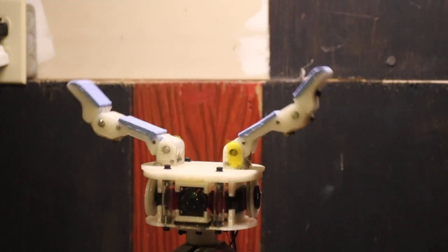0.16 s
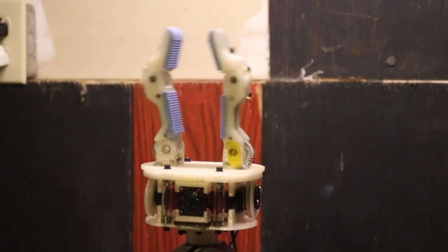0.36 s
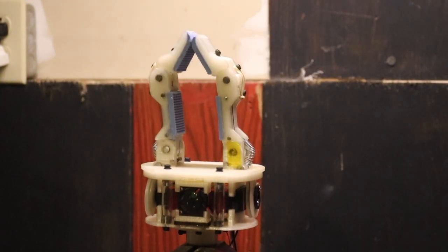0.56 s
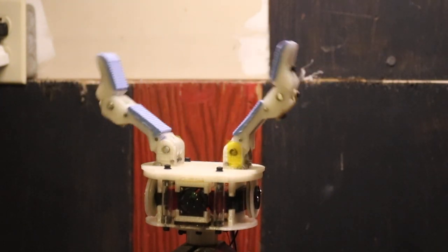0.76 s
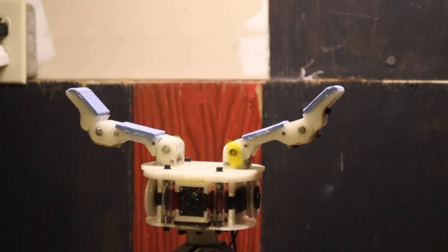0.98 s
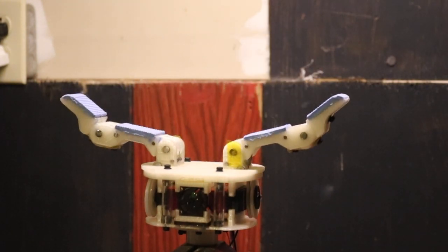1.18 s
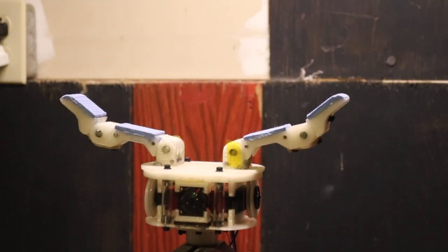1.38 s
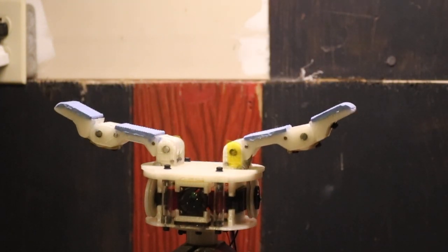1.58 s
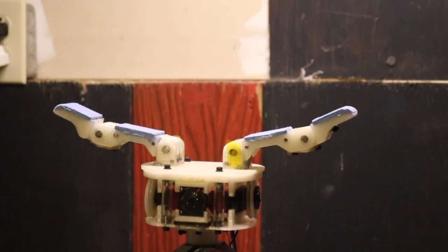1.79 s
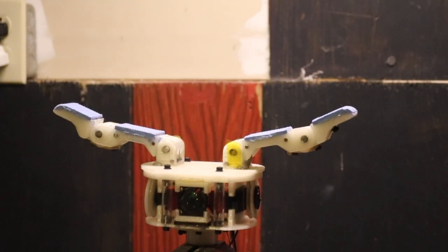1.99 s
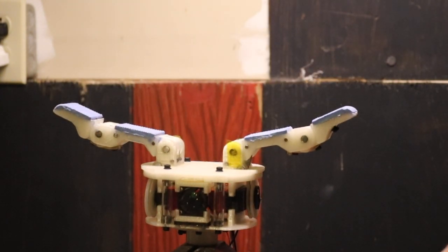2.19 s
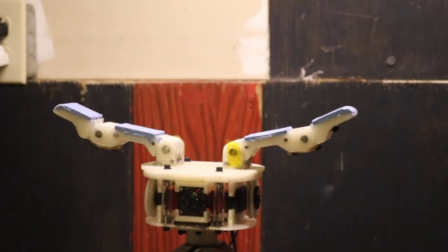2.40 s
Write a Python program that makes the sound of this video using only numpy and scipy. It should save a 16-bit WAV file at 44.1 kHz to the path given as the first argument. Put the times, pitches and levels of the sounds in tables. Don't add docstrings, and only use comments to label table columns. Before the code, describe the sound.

Small geared motors whirr and rattle as a robotic gripper snaps shut, then eases open

```python
import sys
import numpy as np
from scipy import signal
from scipy.fft import rfft, irfft, next_fast_len
from scipy.io import wavfile
from scipy.ndimage import uniform_filter1d

SR = 44100
rng = np.random.default_rng(int(sys.argv[2]) if len(sys.argv) > 2 else 0)


def gain_from_decibels(decibels):
    exponent = np.asarray(decibels, float) / 20
    return 10 ** exponent


def log_audio(samples):
    frames = np.atleast_2d(samples).T
    limited = np.clip(frames, -1, 1)
    pcm = np.round(limited * 32767).astype(np.int16)
    wavfile.write(sys.argv[1], SR, pcm)


N = 108045

# frequency in Hz, likeness (1 = the same).
NEAR_LIKENESS = [(800, 0.79), (3000, 0.93), (7000, 0.16), (12000, 0.0)]
TILT_TOP_HZ = 9100


def rms_one(x):
    return x / np.sqrt(np.mean(np.abs(x) ** 2) + 1e-20)


def in_time(rows):
    s, *columns = np.transpose(rows)
    return [np.interp(np.arange(N) / SR, s, c) for c in columns]


def at_hz(points, hz):
    table_hz, values = np.array(points)[:, 0], np.array(points)[:, 1]
    return np.interp(np.log(hz), np.log(table_hz), values)


def drift(rate_hz):
    r = np.exp(-32 * np.pi * rate_hz / SR)
    noise = rng.standard_normal(N // 16 + 602)
    slow = signal.lfilter([1], [1, -2 * r, r * r], noise)[600:]
    return np.interp(np.arange(N) / 16, np.arange(len(slow)), rms_one(slow))


def spread(mid, side, hz, likeness):
    # frequency in Hz, left minus right in dB.
    balance = [(60, 0), (240, 0), (950, -3), (3770, -2.5), (15000, 1.5)]
    alike = np.clip(at_hz(likeness, hz), -1, 1)
    lean = gain_from_decibels(at_hz(balance, hz) / 2)
    both = np.sqrt(1 + alike) * mid + np.sqrt(1 - alike) * side * [[1], [-1]]
    return both / np.sqrt(2) * [[lean], [1 / lean]]


def banded(drive, spectrum, likeness, patchy_db, tilt_db=0, run_in=0):
    low_hz, high_hz = spectrum[0][0], min(spectrum[-1][0], 17000)
    edges = low_hz * 2 ** np.arange(0, np.log2(high_hz / low_hz) + .1, 1 / 3)
    out = 0
    for k, (low, high) in enumerate(zip(edges, edges[1:])):
        band = signal.butter(2, [low, high], "band", fs=SR, output="sos")
        source = np.tile(drive[k % 2], 2)[:, N - run_in:]
        mid, side = signal.sosfilt(band, source)[:, run_in:]
        hz = np.sqrt(low * high)
        level_db = patchy_db * drift(10.6) + tilt_db * np.log2(min(hz, TILT_TOP_HZ) / 4500)
        out = out + gain_from_decibels(level_db) * spread(mid, side, hz, likeness)
    size = next_fast_len(N)
    colour = gain_from_decibels(at_hz(spectrum, np.arange(1, size // 2 + 2) * SR / size))
    return rms_one(irfft(rfft(out, size) * colour, size)[:, :N])


def whistle(hz, wobble_hz, steady):
    steady = np.clip(steady, 0, 1)
    wander = drift(wobble_hz) + 1j * drift(wobble_hz)
    waver = np.sqrt(steady) + np.sqrt((1 - steady) / 2) * wander
    turns = np.cumsum(hz * np.ones(N)) / SR + rng.random()
    return np.sqrt(2) * np.real(waver * np.exp(2j * np.pi * turns))


def rattle():
    # time in seconds, level in dB, brightness in dB per octave.
    moves = [
        [(0.0, -31.5, 1), (0.042, -40.5, 3), (0.086, -35, 4), (0.102, -34.5, 2), (0.152, -52, -1),
         (0.16, -51, -7)],
        [(0.17, -45.5, 5), (0.212, -22.5, 4), (0.244, -21, 6.5), (0.47, -21, 5), (0.482, -16, 3.5),
         (0.516, -21.5, 7), (.55, -36, 4.5), (0.59, -62, -1)],
        [(0.6, -52, 9), (0.644, -28.5, 1.5), (0.684, -34, -1.5), (0.848, -28, 0.5), (0.878, -34.5, 3),
         (0.912, -30, -0.2), (1.038, -41.5, 2), (1.09, -52, -3)],
        [(1.1, -48.5, 1), (1.204, -45, 0), (1.26, -50, -0.5), (1.384, -61, -13), (1.502, -43.5, 1.2),
         (1.62, -40.5, -2), (1.72, -42, -3.5), (1.795, -47.5, -3.5), (1.83, -54.5, -3.5), (2.4, -53, -5.5),
         (2.45, -56, 5)],
    ]
    # time in seconds, rise in dB, length in seconds,
    # brightness in dB per octave.
    jerks = [(0.065, 8, 0.011, -7), (0.086, 5.5, .01, -2.5), (0.099, 2.5, 0.0058, -1), (0.632, 7, 0.011, 1),
             (0.776, 5, 0.0046, 9), (0.791, -0.5, 0.013, -8.5), (0.812, 0.5, 0.019, 8.5),
             (0.83, 3.5, 0.015, -5), (0.858, 0, 0.0083, -8), (0.918, 0, 0.015, -4.5),
             (0.947, 6.5, 0.011, 3), (1.016, 8.5, 0.037, -3.5), (1.443, 15.5, 0.0032, 6),
             (1.675, 0.5, 0.018, -4.5)]
    # frequency in Hz, level in dB per Hz.
    rattle_colour = [(530, -27), (1510, -14.5), (2150, -9.5), (2500, -1.5), (4010, -2.5), (6800, -3.5),
                     (11500, -16), (13500, -26), (16000, -23)]
    # frequency in Hz, width in Hz, level in dB.
    housing = [(1604, 25, -4.5), (2547, 54, -2.5), (2785, 49, 0), (3090, 90, 3), (3530, 40, -0.5),
               (4390, 93, -8), (5410, 210, -1.5), (6930, 300, -5.5), (7820, 65, -8), (9160, 56, -6),
               (9930, 150, -14.5)]
    jerk_attack_s, teeth_per_s, tooth_spread_db = 0.0031, 9000, 2.2
    housing_widen, housing_flicker_db, housing_db = 3.2, 2.2, -1.5

    effort_db, tilt_db = in_time(np.concatenate(moves))
    t = np.arange(N) / SR
    for s, rise_db, length, bright_db in jerks:
        jerk = np.clip((t - s) / jerk_attack_s + 1, 0, 1) * np.exp(-np.maximum(t - s, 0) / length)
        effort_db = effort_db + rise_db * jerk
        tilt_db = tilt_db + bright_db * jerk

    shape = (2, 2, N)
    teeth = (rng.random(shape) < teeth_per_s / SR) * rng.standard_normal(shape)
    teeth = teeth * gain_from_decibels(tooth_spread_db * np.minimum(rng.exponential(1, shape), 4))

    body = 0
    for k, (hz, width, db) in enumerate(housing):
        r = np.exp(-np.pi * width * housing_widen / SR)
        ring = [1, -2 * r * np.cos(2 * np.pi * hz / SR), r * r]
        hits = teeth[k % 2, :, ::-1]
        mid, side = signal.lfilter([1, 0, -1], ring, hits) * (1 - r * r) / 2
        level_db = db + housing_flicker_db * drift(42) + tilt_db * np.log2(hz / 4500)
        body = body + gain_from_decibels(level_db) * spread(mid, side, hz, NEAR_LIKENESS)

    in_air = banded(teeth, rattle_colour, NEAR_LIKENESS, patchy_db=1.5, tilt_db=tilt_db)
    mix = in_air + gain_from_decibels(housing_db) * rms_one(body)
    return gain_from_decibels(effort_db + 0.11 - 2.5) * rms_one(mix)


def background():
    # frequency in Hz, level in dB per Hz.
    air_colour = [(290, -15), (500, -6.5), (843, -6), (1060, -3), (1340, -7.5), (2160, -7.5), (4210, -12.5),
                  (4730, -12), (16000, -29)]
    rumble_colour = [(22, 1), (35, -3), (50, 1.5), (70, 2), (110, 2), (200, -2.5), (400, -6.5), (560, -24)]
    # frequency in Hz, left-right likeness (1 = the same).
    room_likeness = [(40, 1), (150, 0.92), (300, 0.49), (600, 0.51), (1500, 0.22), (3000, 0.3),
                     (6000, 0.52), (12000, 0.15)]
    # frequency in Hz, level in dB.
    hum_tones = [(120, -65), (178, -62.5), (239, -58), (300, -61.5), (360, -64.5), (479, -65)]
    # frequency in Hz, level in dB, wobble in Hz.
    whine_tones = [(1055, -69, 20), (1583, -68, 15), (2110, -60, 4), (3165, -70, 10), (4576, -67.5, 20),
                   (4748, -64.5, 45), (4926, -71, 40)]
    air_db, rumble_db, hiss_db = -52, -52, -70

    white = rng.standard_normal((2, 2, N))
    air = gain_from_decibels(air_db) * banded(white, air_colour, room_likeness, patchy_db=1.24)
    rumble = banded(white[::-1], rumble_colour, room_likeness, patchy_db=2.2, run_in=SR // 4)
    air = air + gain_from_decibels(rumble_db) * rumble
    hum = sum(gain_from_decibels(db) * whistle(hz, 4.0, 0.75) for hz, db in hum_tones)
    whine = 0
    for hz, db, wobble_hz in whine_tones:
        mid, side = whistle(hz, wobble_hz, 1.0), whistle(hz, wobble_hz, 0.18)
        whine = whine + gain_from_decibels(db) * spread(mid, side, hz, room_likeness)
    return air + hum + whine + gain_from_decibels(hiss_db) * rng.standard_normal((2, N))


def mesh():
    # time in seconds, teeth meeting per second in Hz, tone level in dB.
    stroke = [(.205, 985, -37), (.245, 1180, -34), (.272, 1460, -29), (.306, 1715, -29), (.335, 1805, -30),
              (.41, 1850, -29), (.455, 1780, -32), (.485, 1550, -31), (.515, 1230, -33)]
    # multiple of the tooth rate, level in dB, wobble in Hz, left motor over right in dB.
    harmonics = [(1, -3, 25, 18), (2, .5, 100, 8), (3, -4.5, 120, -8), (4, -4.5, 140, 8), (5, -6, 200, 0),
                 (6, -8, 250, 6), (7, -9, 250, 0)]
    # frequency in Hz, level in dB.
    mesh_colour = [(1100, -20), (1800, -5), (2400, -12), (2900, 2), (4400, -3), (5300, 2), (6200, -2),
                   (11000, -10)]
    motor_gap, motor_pan_db, mesh_lean_db = .008, 5.0, -8
    right_top_hz = 1780
    pinion_teeth, runout = 12.0, .35

    hz, db = in_time(stroke)
    hz = uniform_filter1d(hz, size=700)
    t = np.arange(N) / SR
    gate = np.clip((t - stroke[0][0]) / 0.019, 0, 1) * np.clip((stroke[-1][0] - t) / 0.017, 0, 1)
    out = 0
    for sign in (1, -1):
        if sign > 0:
            own_hz = hz * (1 + motor_gap / 2)
        else:
            own_hz = uniform_filter1d(np.minimum(hz, right_top_hz), size=700)
        gear_turns = np.cumsum(own_hz) / SR / pinion_teeth + rng.random()
        throb = 1 + runout * np.sin(2 * np.pi * gear_turns)
        tone = 0
        for k, order_db, wobble_hz, left_db in harmonics:
            level_db = order_db + sign * left_db / 2 - abs(left_db) / 4 + at_hz(mesh_colour, k * own_hz)
            tone = tone + gain_from_decibels(level_db) * whistle(round(k) * own_hz, wobble_hz, .62)
        pan = gain_from_decibels((sign * motor_pan_db + mesh_lean_db) * np.array([[.5], [-.5]]))
        out = out + throb * tone * pan
    return out * gate * gain_from_decibels(db - 1)


def knocks():
    # time in seconds, level in dB, frequency in Hz, time to fall by 60 dB in seconds.
    blows = [(0.247, -31, 159, 0.098), (0.358, -46.5, 71.7, 0.58), (0.46, -38.5, 181.6, 0.25),
             (0.891, -27, 160, 0.039), (.93, -42, 424, 0.069)]
    out, t = np.zeros(N), np.arange(N) / SR
    for s, db, hz, t60 in blows:
        age = np.maximum(t - s, 0)
        onset = np.clip(age * hz / 0.78, 0, 1)
        out += gain_from_decibels(db - 60 * age / t60) * np.sin(2 * np.pi * hz * age) * onset
    return out


def claps():
    # time in seconds, level in dB, time to fall by 60 dB in seconds.
    bounces = [
        (0.473, -33, 0.042),
        (0.484, -35, 0.051),
        (0.494, -45, 0.05),
    ]
    # frequency in Hz, level in dB per Hz.
    clap_colour = [(150, 0), (300, -1), (480, -1), (700, -8), (1000, -4), (1500, 0), (3000, -4),
                   (12000, -24)]
    t = np.arange(N) / SR
    shape = sum((t > s) * gain_from_decibels(db - 60 * np.maximum(t - s, 0) / t60) for s, db, t60 in bounces)
    return shape * banded(rng.standard_normal((2, 2, N)), clap_colour, NEAR_LIKENESS, patchy_db=4.0)


def ports(x):
    echo_db, span_s, low_hz = -8, .014, 1800
    bright = signal.sosfilt(signal.butter(1, low_hz, "high", fs=SR, output="sos"), x)
    out = x.copy()
    for k, (share, sign) in enumerate(zip(rng.uniform(.1, 1, 10), rng.choice([-1, 1], 10))):
        lag = int(share * span_s * SR) + 1
        out[k % 2, lag:] += sign * gain_from_decibels(echo_db) * bright[k % 2, :-lag]
    return out


def room(x):
    room_t60_s, wall_cut_hz = 0.33, 9600
    out, size = np.zeros((2, N)), next_fast_len(N + SR)
    w, spec = np.linspace(0, np.pi, size // 2 + 1), rfft(x, size)
    dull = 1 / np.sqrt(1 + (w * SR / (2 * np.pi * wall_cut_hz)) ** 2)
    for k, lag in enumerate(rng.uniform(.011, .033, 16) * SR):
        loss = gain_from_decibels(-60 * lag / SR / room_t60_s) * dull ** (lag / SR * 20)
        loop = loss * np.exp(-1j * w * lag)
        echoes = irfft(spec[k % 2] * loop / (1 - loop), size)[:N]
        out[k % 2] += echoes * (-1) ** (k // 2)
    return out


def scene():
    near = ports(rattle() + claps() + knocks())
    direct = near + mesh()
    return direct + gain_from_decibels(-21.5) * room(direct) + background()


def band_limit(x):
    return signal.sosfilt(signal.butter(12, 15810, fs=SR, output="sos"), x)


def record(dry):
    notch_hz, width_hz, top_hz = 15160, 130, 15900
    edges = [notch_hz - width_hz / 2, notch_hz + width_hz / 2]
    notched = signal.sosfilt(signal.butter(2, edges, "bandstop", fs=SR, output="sos"), dry)
    mix = signal.sosfilt(signal.cheby2(12, 60, top_hz + 900, fs=SR, output="sos"), notched)
    return band_limit(mix)


dry = scene()
out = record(dry)
log_audio(out)
```